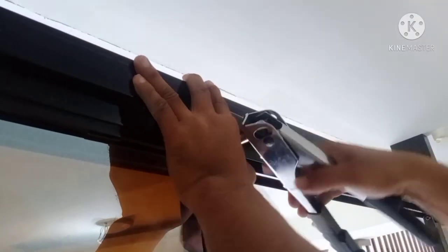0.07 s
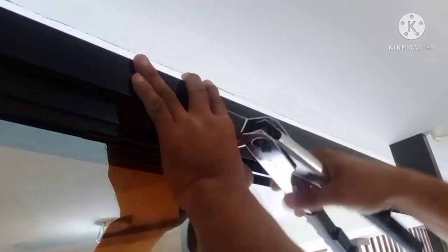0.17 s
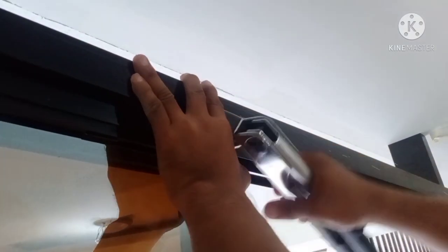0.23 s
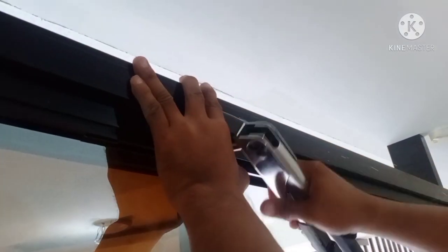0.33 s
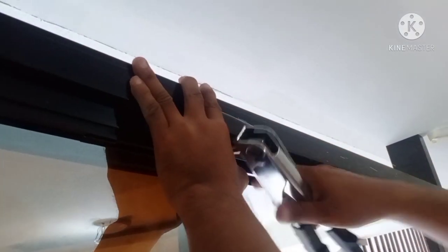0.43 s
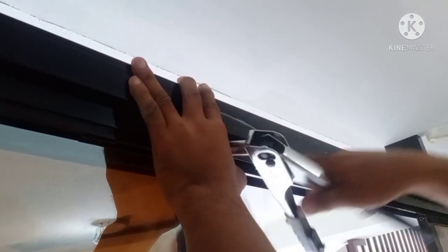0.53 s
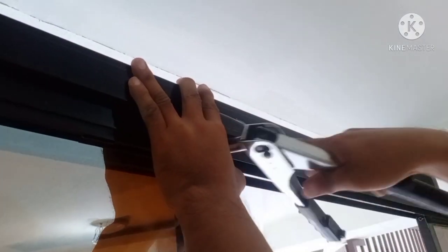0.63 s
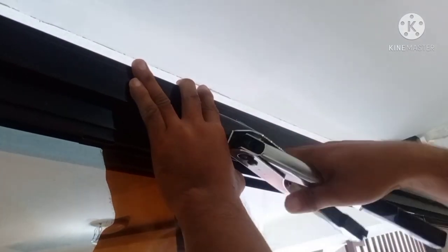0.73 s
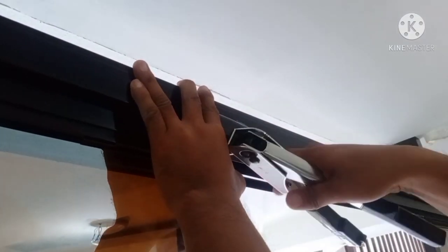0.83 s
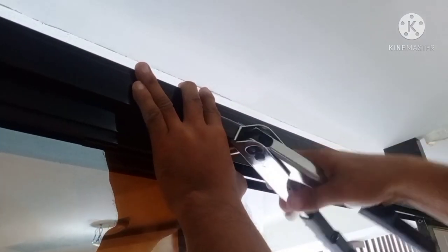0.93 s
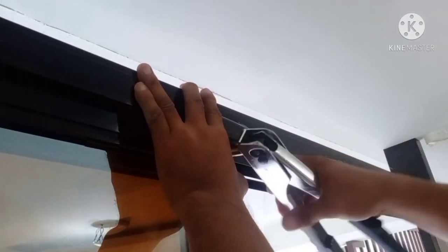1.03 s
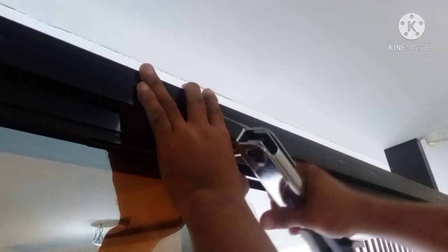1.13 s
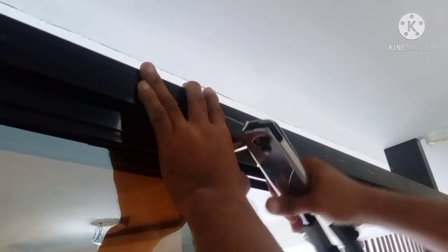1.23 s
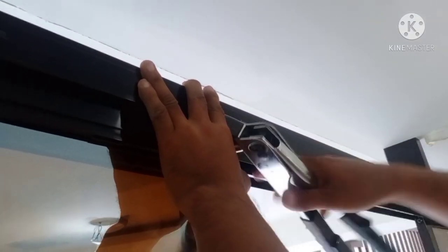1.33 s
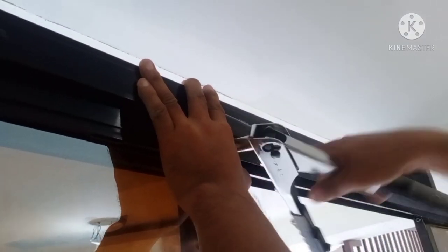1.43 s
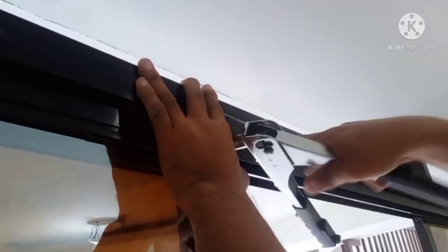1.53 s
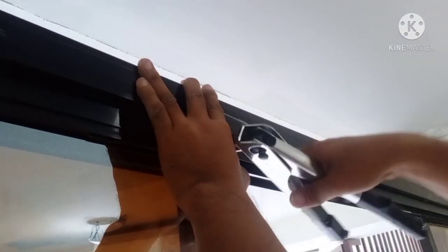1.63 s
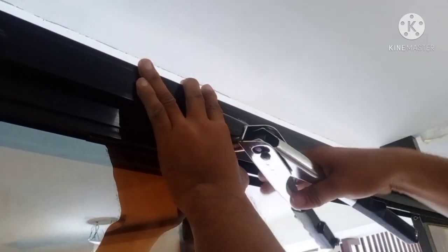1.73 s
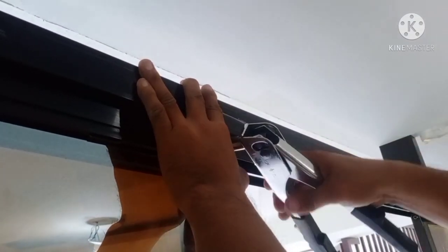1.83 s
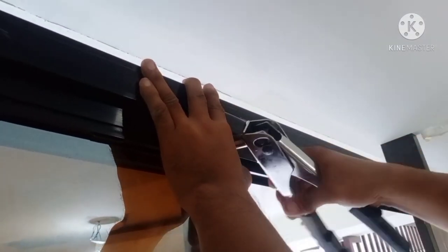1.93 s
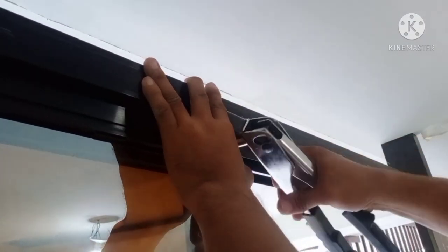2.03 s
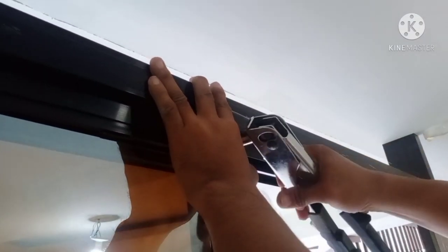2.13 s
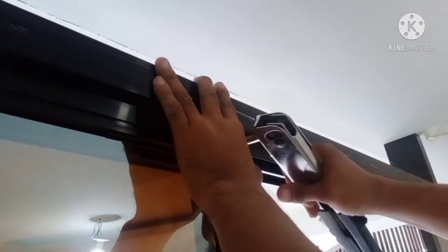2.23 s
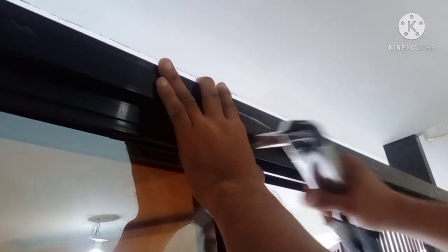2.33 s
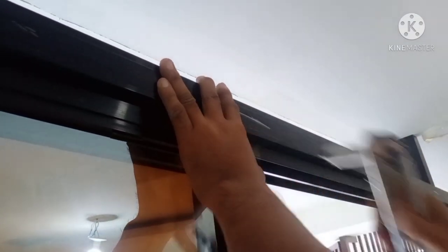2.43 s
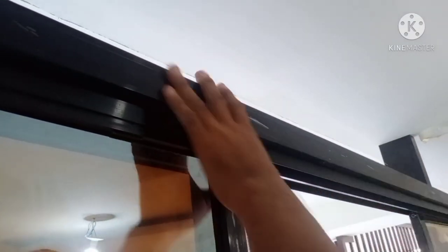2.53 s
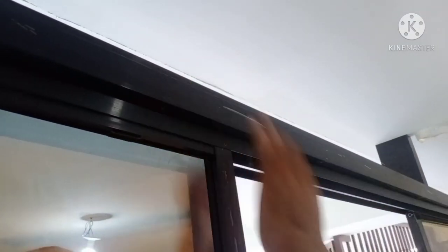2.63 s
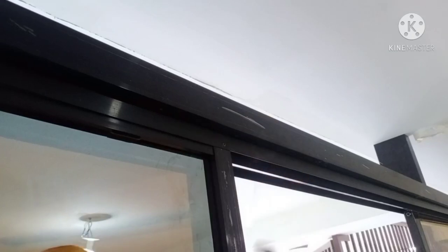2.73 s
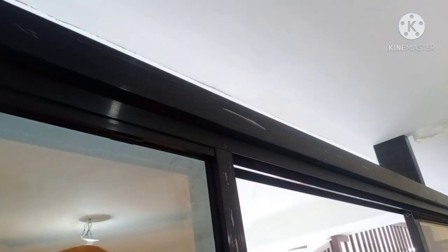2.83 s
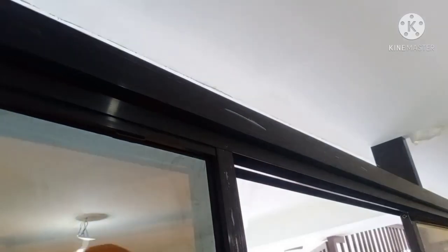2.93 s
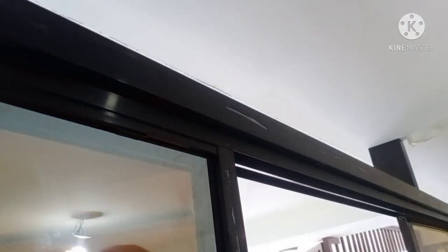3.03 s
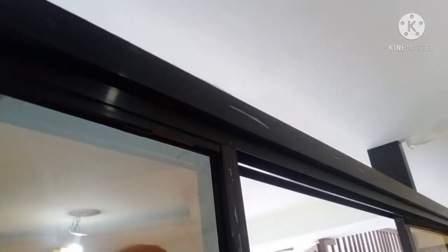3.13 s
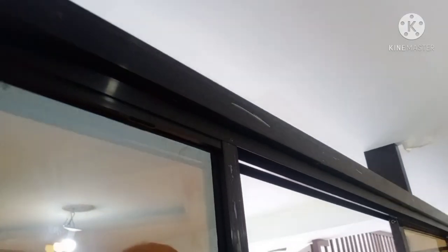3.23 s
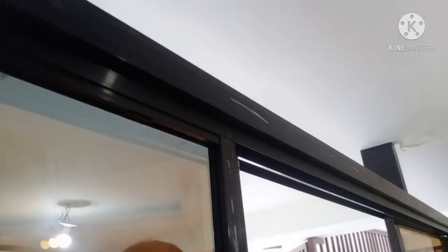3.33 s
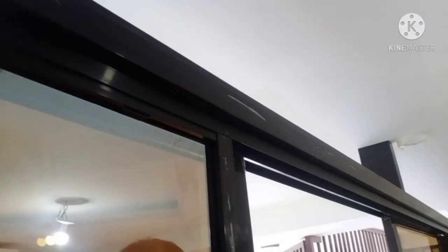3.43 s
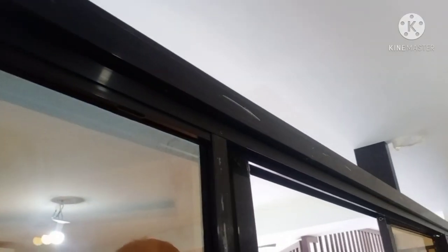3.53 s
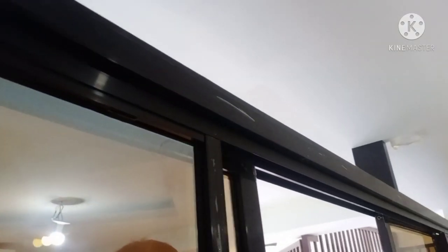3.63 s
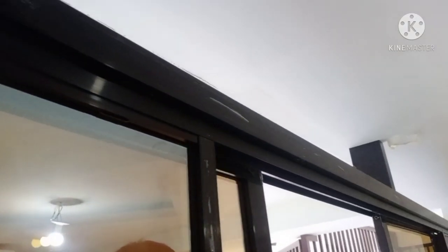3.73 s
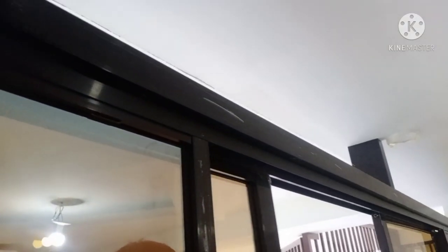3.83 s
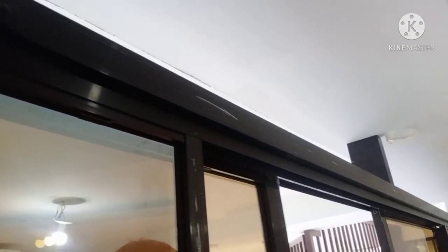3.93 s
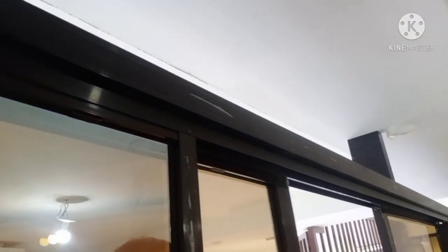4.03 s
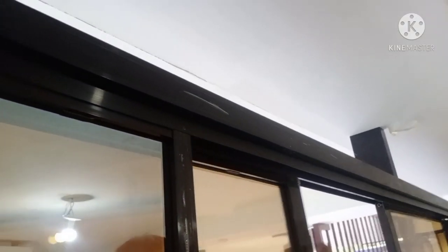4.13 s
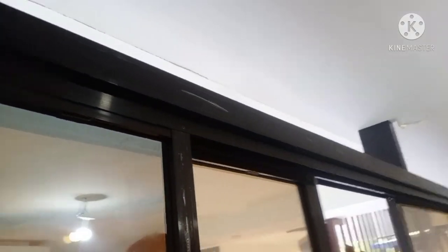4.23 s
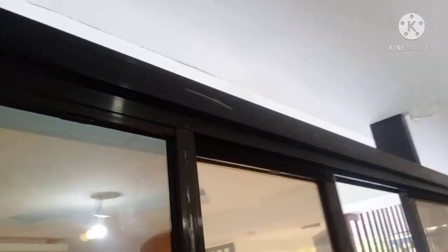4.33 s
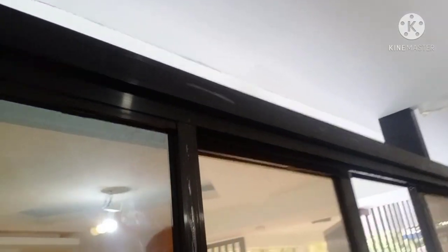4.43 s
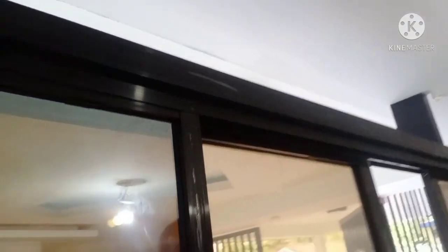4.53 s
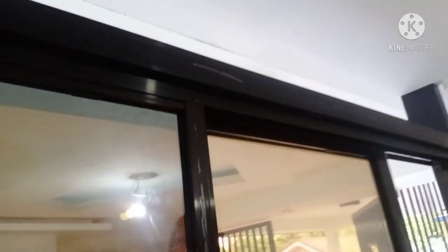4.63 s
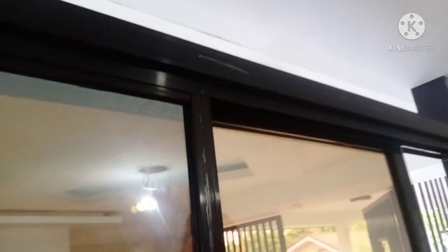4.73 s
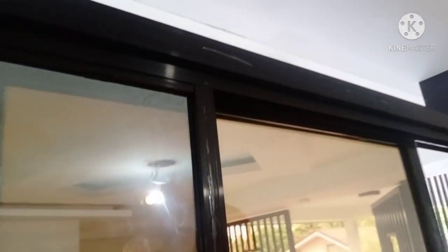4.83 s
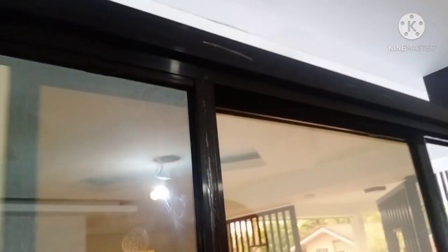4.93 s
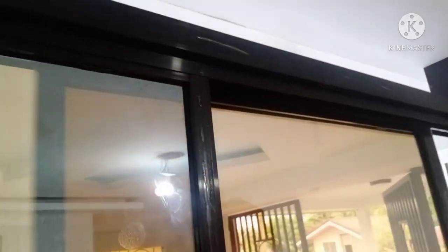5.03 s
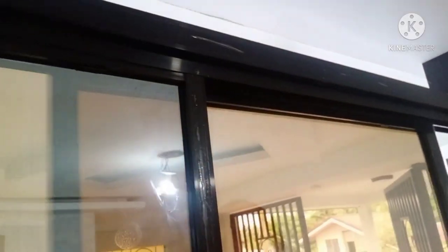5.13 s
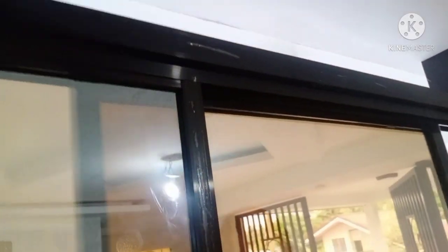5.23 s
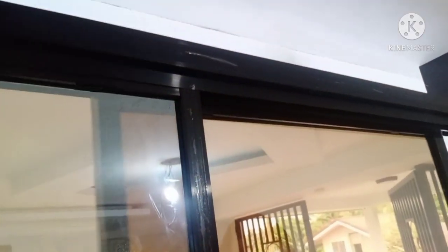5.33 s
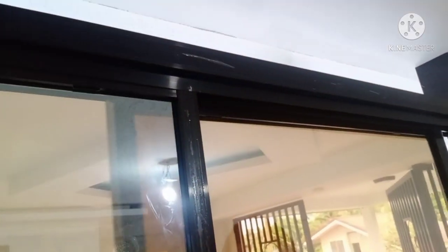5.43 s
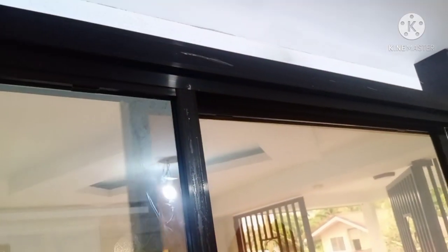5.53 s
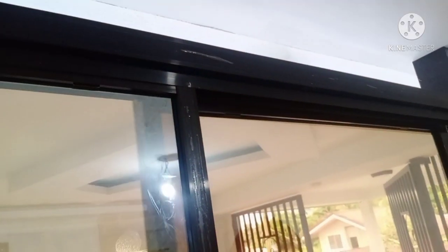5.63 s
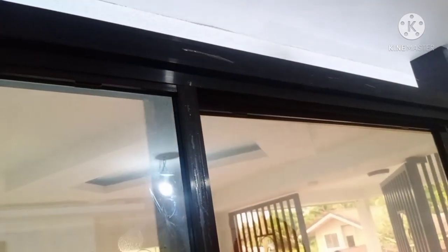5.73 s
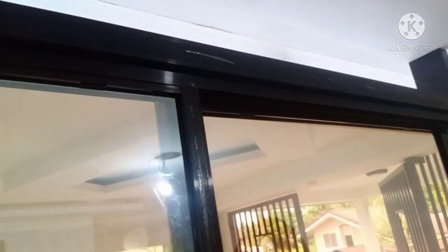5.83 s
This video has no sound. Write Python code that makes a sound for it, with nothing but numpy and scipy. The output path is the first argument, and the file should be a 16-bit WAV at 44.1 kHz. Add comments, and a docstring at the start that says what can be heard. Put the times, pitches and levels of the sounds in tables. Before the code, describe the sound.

A mono, close recording in a bare, reverberant room with faint low rumble. At the start the tail of a jolt rings while a steel pivot squeals thinly until about 0.25 s; a spring snaps near 0.3 s. From 0.4 to 0.8 s clicks, slips and hollow thuds cluster into a firm stroke, with a low groan and thin squeak. Lighter clicks follow around 1.0 to 1.4 s, then a second strong stroke with a dull, boomy jolt at 1.5 to 1.6 s. The echoes fade through small creaks. At 2.26 s the rivet stem breaks with a huge, bright, compressed crack and ringing tail. Thin scratchy scrapes come at 2.7 to 2.9 s. From about 3 s a sash rolls very quietly, swelling around 4 to 4.7 s, gritty, with small dull knocks, faint chirps and thin hiss. It fades by 5.3 s; a fainter nudge comes near 5.6 s, with a last knock at 5.8 s.

```python
"""Hand rivet tool on a window frame

A hand rivet tool is pumped against an aluminium window frame in a bare, echoing room. Lever, jaws and spring click
as rung resonances; each stroke jolts the frame: a noise impact with echoes, coloured by the hollow profile.
The rivet stem snaps with a crack that a limiter holds down. The tool scrapes free, then a sash rolls quietly
along its track: patchy noise, knocks and chirps. Filtered noise gives squeaks, groans, rumble and hiss."""
import sys
import numpy as np
from scipy import signal
from scipy.io import wavfile
from scipy.ndimage import uniform_filter1d

SR = 44100
rng = np.random.default_rng(int(sys.argv[2]) if len(sys.argv) > 2 else 0)


def dump_mix(stems):
    """Bounce the given channels to the path in sys.argv[1] as a 16-bit WAV at rate SR."""
    frames = np.atleast_2d(stems).T  # one column per channel
    limited = np.clip(frames, -1, 1)  # hard clip at full scale
    pcm = np.round(limited * 32767).astype(np.int16)
    wavfile.write(sys.argv[1], SR, pcm)


N = 259308

# Jolts of the frame. Each row: start in seconds, level in dB, bass weight in dB, brightness in dB,
# first impact over the ring in dB.
JOLTS = [(-.03, -27.5, 15.5, -9, -15), (.519, -42, -2.5, -2, 4.5), (.601, -37.5, 18.5, 0, -6),
         (.712, -26.5, 8.5, 7, 8.5), (1.499, -31, 5.5, -13.5, -1.5), (1.606, -20.5, 8.5, .5, 5.5),
         (2.2606, 2.5, -8, 6.5, 9.5)]
# Centres of thud, body, mid range, edge and fizz in Hz.
JOLT_BANDS_HZ = [120, 400, 1200, 3500, 13000]
# The body follows the weight, the edge follows the brightness.
BODY_SHARE, BODY_DB, EDGE_SHARE, EDGE_DB = 0.55, -2, 0.25, -4.5
# The tool catches on the frame as it is pulled free. Each row: start in seconds, level in dB,
# first impact over the ring in dB.
SCRAPES = [(2.7, -32.5, -1.5), (2.724, -30, 4), (2.767, -32.5, 9), (2.778, -39.5, 19), (2.859, -45.5, -8)]
# Scrape thud, body, edge and fizz against the mid range, in dB.
SCRAPE_COLOUR_DB = (-27, -2.5, 11.5, 13.5)
# Broad colour of frame and room together. Each row: frequency in Hz, density in dB per Hz.
FRAME_COLOUR = [(25, -31), (55, -26), (110, -6.5), (160, -14.5), (330, -6), (700, -6), (950, -5),
                (1700, -7), (2400, -7), (4300, -12.5), (6200, -16), (8000, -13.5), (13500, -22.5),
                (16000, -17)]
# Resonances of the hollow profile. Each row: frequency in Hz, width in Hz, peak in dB.
PROFILE_MODES = [(119.4, 31, -1), (194, 8.2, -2.5), (227, 81, -0.5), (336.5, 15, -3.5), (541, 43, -5),
                 (599.4, 28, -3.5), (880, 11, -7.5), (1023, 12, -11), (1183, 47, -2), (1327, 100, -3.5),
                 (1580, 250, -5.5), (1993, 19, -9), (3180, 81, -7), (3320, 130, -4), (5730, 420, 0),
                 (6330, 220, 1)]
# Nominal room decay. Each row: frequency in Hz, t60 in seconds.
ROOM_T60 = [(100, 0.78), (400, 0.74), (1200, 0.74), (3000, 0.68), (7000, 0.56), (14000, 0.46)]
# Low cut of the jolts; climbs steeply after the crack. Each row: time in seconds, edge in Hz.
BASS_EDGE = [(0, 20), (2.57, 29), (2.6, 330), (2.7, 380), (2.8, 520), (3.1, 410)]

# Ringing of the steel parts. Each row: frequency in Hz, filter width in Hz, level in dB.
JAW_MODES = [(2734, 680, 4.5), (4320, 340, 3.5), (4500, 60, -2)]
SPRING_MODES = [(5940, 190, -16), (6490, 260, -3.5), (7400, 190, -16)]
TICK_MODES = [(9500, 3100, -5), (13190, 3700, -15.5)]
# The return spring snaps as the handles open. Each row: start in seconds, level in dB.
SNAPS = [(.288, -38.5), (1.044, -60), (1.173, -40.5), (1.18, -36.5), (2.058, -57.5)]
# The jaws clack onto the stem. Each row: start in seconds, level in dB, tick against the rest in dB.
CLACKS = [(.475, -63, -15), (.521, -45.5, 10.5), (0.714, -29, 0), (0.746, -38, 8), (1.243, -51.5, -23),
          (1.315, -36.5, -26), (1.394, -44.5, 1.5), (1.414, -45.5, 16.5), (1.424, -44.5, 12.5),
          (1.499, -32.5, 6.5), (1.876, -46.5, -4)]
# The lever sticks and slips under load. Each row: start in seconds, lever pitch in Hz, level in dB.
SLIPS = [(0.362, 1440, -46.5), (.472, 1280, -44), (0.534, 1240, -38), (0.6, 1695, -31), (0.621, 1350, -28),
         (0.644, 1293, -35), (.669, 1380, -37), (0.746, 1780, -26.5), (0.984, 1540, -39.5),
         (1.492, 1305, -27)]
# Lever pitch; mix of lever, jaws, spring, tick; base echo level, offset for each part in click().
SNAP_LEVER_HZ, SNAP_MIX_DB, SNAP_ROOM_DB = 1570, (-17.5, -18, 1.5, -1.5), -9
CLACK_LEVER_HZ, CLACK_MIX_DB, CLACK_ROOM_DB = 1400, (-5.5, -0.3, -0.5), -13.5  # tick comes from CLACKS
SLIP_MIX_DB, SLIP_ROOM_DB = (-2, -20, -38, -20), -18.5

# The pivot squeals through the first stroke. Each row: partial in Hz, level in dB.
SQUEAL_PARTIALS = [(1660, -52.5), (2590, -50), (3080, -54), (3770, -53.5), (4320, -54)]
SQUEAL_AT_S, SQUEAL_S = 0.036, 0.21
# Thin squeaks of metal on metal, from the tool and then the rollers. Each row: start in seconds,
# length in seconds, pitch in Hz, level in dB.
SQUEAKS = [(.514, .018, 4670, -39), (1.311, 0.01, 4800, -36), (0.793, .25, 2300, -47.5),
           (2.87, .16, 1400, -53), (2.86, .17, 2600, -51.5), (4.002, 0.093, 4460, -59.5),
           (5.437, 0.12, 2956, -63), (5.771, .12, 2080, -57.5)]
# Low groans of the frame under the hand's push. Each row: start in seconds, pitch in Hz, level in dB.
GROANS = [(0.129, 220, -43), (.25, 520, -51), (.36, 86, -49), (.56, 587, -45), (.76, 204.6, -35),
          (1.5, 239, -41), (1.81, 513, -45), (2.02, 104, -44.5)]
GROAN_S = 0.13

# Swells of the rolling sash, the second a nudge. Each row: start in seconds, rise in seconds,
# hold in seconds, fall in seconds, level in dB.
ROLL_SWELLS = [(3.05, .9, 0.72, 0.62, -59.5), (5.4, 0.27, 0.086, 0.26, -65)]
ROLL_RANGE_DB = 21
# Roller noise spectrum. Each row: frequency in Hz, relative density in dB per Hz.
ROLL_COLOUR = [(100, -19.5), (300, 1), (600, -1.5), (1400, -2.5), (2500, -7), (4500, -13), (8000, -11.5),
               (16000, -37.5)]
# Clear knocks of the sash. Each row: start in seconds, pitch in Hz, level in dB.
KNOCKS = [(3.348, 1526, -51.5), (3.473, 1300, -53.5), (3.744, 1280, -59), (4.268, 1370, -59),
          (4.531, 1460, -57), (4.66, 513, -55), (4.733, 1470, -56.5), (5.828, 1300, -53),
          (5.831, 2060, -53.5)]
# Small bumps of the track and faint chirps of the rollers; levels against the rollers.
BUMPS_PER_S, BUMP_LOW_HZ, BUMP_HIGH_HZ, BUMP_DB = 13, 444, 1417, -1.5
CHIRPS_PER_S, CHIRP_LOW_HZ, CHIRP_HIGH_HZ, CHIRP_S, CHIRP_DB = 4, 2800, 4520, 0.099, -14

# Spectra of room rumble and hiss. Each row: frequency in Hz, relative density in dB per Hz.
RUMBLE_COLOUR = [(20, -59), (50, -29.5), (75, -4), (105, 8.5), (150, -8), (400, -10.5), (1300, -15),
                 (3000, -22), (7000, -28), (10000, -36), (16000, -56)]
HISS_COLOUR = [(1000, -19), (3500, -15.5), (5600, -20), (6600, 1), (8200, 2.5), (10800, -4.5), (12200, 1),
               (13500, -2.5), (15500, 2)]
# Spells of thin hiss. Each row: start in seconds, rise in seconds, hold in seconds, fall in seconds, level in dB.
HISS_SWELLS = [(.39, 0.075, 0.42, 0.13, -51), (2.6, 0.21, 0.14, 0.18, -47), (3.14, .15, 2.46, 0.42, -53)]
HISS_RANGE_DB = 23

# Gate threshold. Each row: frequency in Hz, bin magnitude in dB.
GATE_THRESHOLD = [(60, -74), (130, -59.5), (300, -63), (600, -60.5), (1500, -65.5), (4000, -77.5),
                  (8000, -104), (14000, -81)]
# Microphone response. Each row: frequency in Hz, gain in dB.
MIC_RESPONSE = [(20, 0.5), (7500, -1), (8300, -7.5), (9300, -18.5), (11000, -7.5), (12300, -4),
                (13500, 9.5), (15400, -4), (16500, -14.5)]
CUTOFF_HZ = 15900


def frame():
    """Strokes, the snapping stem and the scraping tool jolt the frame; a moving low cut thins the bass."""
    out = np.zeros(N)
    for start_s, db, weight_db, bright_db, impact_db in JOLTS:
        body_db = BODY_DB + BODY_SHARE * weight_db
        edge_db = EDGE_DB + EDGE_SHARE * bright_db
        add(out, start_s, jolt(db, weight_db, body_db, edge_db, bright_db, impact_db))
    for start_s, db, impact_db in SCRAPES:
        add(out, start_s, jolt(db, *SCRAPE_COLOUR_DB, impact_db))
    hz, t, z = signal.stft(out, SR, nperseg=1024)
    edge_hz = np.interp(t, *np.transpose(BASS_EDGE))
    low_cut = 1 / np.sqrt(1 + (edge_hz / (hz[:, None] + 1)) ** 8)
    return signal.istft(z * low_cut, SR, nperseg=1024)[1][:N]


def jolt(db, thud_db, body_db, edge_db, fizz_db, impact_db, impact_s=0.022, build_s=0.044, swell_db=7.0):
    """A short impact and the echoes that build up behind it, coloured by the hollow frame."""
    tail = room_tail(size=SR * 3 // 2)
    t = np.arange(len(tail)) / SR
    impact = amp(impact_db) * np.exp(-t / impact_s) * rng.standard_normal(len(t))
    echoes = amp(swell_db) * (1 - np.exp(-t / build_s)) * tail
    hardness = list(zip(JOLT_BANDS_HZ, [thud_db, body_db, 0, edge_db, fizz_db]))

    def gain(hz):
        """The frame's broad colour with its resonances standing out."""
        peaks = sum(amp(peak_db) / (1 + (2 * (hz - mode_hz) / width_hz) ** 2)
                    for mode_hz, width_hz, peak_db in PROFILE_MODES)
        return amp(read(FRAME_COLOUR, hz) + read(hardness, hz)) * (1 + peaks)

    gain_rms = np.sqrt(np.mean(gain(np.arange(0, SR / 2, 10)) ** 2))
    return amp(db) * causal(impact + echoes, gain) / gain_rms


def room_tail(size, uneven=0.16, ripple_db=1.5, blend_hz=7000):
    """Dense ringing and echoes; some partials outlast their neighbours, and the treble dies first."""
    hz, t, z = signal.stft(rng.standard_normal(size), SR, nperseg=1024)
    favour = rng.standard_normal(len(hz))
    favour = unit(uniform_filter1d(favour, size=2) - uniform_filter1d(favour, size=9))
    mid_weight = 1 / (1 + (hz / blend_hz) ** 2) * hz / (hz + 200)
    favour = np.clip(favour, -2, 2) * mid_weight
    t60_s = read(ROOM_T60, hz) * np.exp(uneven * (favour - 0.5))
    z = z * amp(ripple_db * favour[:, None] - 60 * t / t60_s[:, None])
    return signal.istft(z, SR, nperseg=1024)[1][:size]


def tool():
    """The spring snaps back, the jaws take hold, and the lever slips as it is squeezed."""
    out = np.zeros(N)
    for start_s, db in SNAPS:
        add(out, start_s, amp(db) * click(SNAP_LEVER_HZ, SNAP_MIX_DB, SNAP_ROOM_DB))
    for start_s, db, tick_db in CLACKS:
        add(out, start_s, amp(db) * click(CLACK_LEVER_HZ, (*CLACK_MIX_DB, tick_db), CLACK_ROOM_DB))
    for start_s, hz, db in SLIPS:
        add(out, start_s, amp(db) * click(hz, SLIP_MIX_DB, SLIP_ROOM_DB))
    return out


def click(lever_hz, mix_db, room_db, lever_width_hz=140):
    """A click rings the lever, the jaws and the return spring, with a bright tick of steel on steel."""
    lever_db, jaws_db, spring_db, tick_db = mix_db
    lever = amp(lever_db) * strike([(lever_hz, lever_width_hz, 0)], 0.0072, room_db + 10.5)
    jaws = amp(jaws_db) * strike(JAW_MODES, 0.014, room_db + 2.5)
    spring = amp(spring_db) * strike(SPRING_MODES, 0.0014, room_db + 1.0)
    tick = amp(tick_db) * strike(TICK_MODES, 0.0015, room_db, damping_db_per_s=69)
    return lever + jaws + spring + tick


def strike(modes, contact_s, room_db, damping_db_per_s=10):
    """A brief chatter of contact and its extra-damped echoes ring one part; direct attack at rms 1."""
    echoes = room_tail(size=SR * 3 // 5, ripple_db=9.5, blend_hz=11300)
    t = np.arange(len(echoes)) / SR
    chatter = rng.standard_normal(len(t)) * np.exp(-t / contact_s) * (1 - np.exp(-t / 0.00025))
    direct = unit(resonate(chatter, modes), size=530)
    damped = echoes * (1 - np.exp(-t / 0.001)) * amp(-damping_db_per_s * t)
    return direct + amp(room_db) * unit(resonate(damped, modes), size=2600)


def friction():
    """Steel squeals and squeaks; the frame groans under the hand."""
    squeal = [(SQUEAL_AT_S, SQUEAL_S, hz, db) for hz, db in SQUEAL_PARTIALS]
    groans = [(start_s, GROAN_S, hz, db) for start_s, hz, db in GROANS]
    return rubbing(squeal + SQUEAKS, sharpness=65) + rubbing(groans, sharpness=13.2)


def rubbing(rows, sharpness):
    """Short swells of a narrow resonance driven by friction noise."""
    out = np.zeros(N)
    for start_s, length_s, hz, db in rows:
        ring = resonate(rng.standard_normal(SR), [(hz, hz / sharpness, 0)])
        rub = unit(ring[-round(length_s * SR):])  # the end, where the resonance is settled
        add(out, start_s, amp(db) * rub * signal.windows.tukey(len(rub), 0.8))
    return out


def sash(grit_db=1.5):
    """Rollers rumble unevenly over grit, chirp, and knock on the track."""
    grit = np.tanh(unit(uniform_filter1d(rng.standard_normal(N), size=500)))
    rollers = amp(grit_db * grit) * noise(ROLL_COLOUR, patchy_db=6.5)
    chirps = scatter(CHIRPS_PER_S, CHIRP_LOW_HZ, CHIRP_HIGH_HZ)
    rollers += rubbing([(start_s, CHIRP_S, hz, CHIRP_DB) for start_s, hz in chirps], sharpness=69)
    for start_s, hz in scatter(BUMPS_PER_S, BUMP_LOW_HZ, BUMP_HIGH_HZ):
        add(rollers, start_s, amp(BUMP_DB) * knock(hz))
    out = swells(ROLL_SWELLS, ROLL_RANGE_DB) * rollers
    for start_s, hz, db in KNOCKS:
        add(out, start_s, amp(db) * knock(hz))
    return out


def knock(hz, sharpness=4):
    """A short dull ring of the track."""
    return strike([(hz, hz / sharpness, 0)], 0.0077, -4.5, damping_db_per_s=133)


def scatter(per_s, low_hz, high_hz):
    """Chance events, one in each 1 / per_s of the whole scene: rows of start in seconds, pitch in Hz."""
    draws = rng.random(size=(200, 2))
    return [((k + when) / per_s, low_hz * (high_hz / low_hz) ** pitch)
            for k, (when, pitch) in enumerate(draws) if k < per_s * N / SR]


def air(rumble_db=-62.5):
    """Low room rumble, and a thin hiss that comes and goes."""
    rumble = amp(rumble_db) * noise(RUMBLE_COLOUR, patchy_db=2.0)
    hiss = swells(HISS_SWELLS, HISS_RANGE_DB) * noise(HISS_COLOUR, patchy_db=3.9)
    return rumble + hiss


def noise(colour, patchy_db):
    """Noise of rms 1 with a given spectrum and drifting patches."""
    hz, t, z = signal.stft(rng.standard_normal(N), SR, nperseg=1024, noverlap=768)
    blur = np.outer(np.hanning(7), np.hanning(19))  # bins by frames
    patches = unit(signal.oaconvolve(rng.standard_normal(z.shape), blur, "same"))
    z = z * amp(read(colour, hz)[:, None] + patchy_db * patches)
    return unit(signal.istft(z, SR, nperseg=1024, noverlap=768)[1][:N])


def swells(rows, range_db):
    """Gain at every sample: each swell rises through range_db, holds, and falls away again."""
    t = np.arange(N) / SR
    out = 0
    for start_s, rise_s, hold_s, fall_s, db in rows:
        before = 1 - (t - start_s) / rise_s
        after = (t - start_s - rise_s - hold_s) / fall_s
        out = out + amp(db - range_db * np.maximum(np.maximum(before, after), 0))
    return out


def resonate(x, modes):
    """Parallel resonances, each with steep skirts."""
    out = 0
    for hz, width_hz, db in modes:
        q = hz / width_hz
        core = signal.lfilter(*signal.iirpeak(hz, q, SR), x)
        out = out + amp(db) * signal.lfilter(*signal.iirpeak(hz, max(q / 4, 1), SR), core)
    return out


def causal(x, gain, size=8192):
    """Minimum-phase filter by gain(Hz): no sound ahead of an attack."""
    log_gain = np.log(np.maximum(gain(abs(np.fft.fftfreq(size, 1 / SR))), 1e-5))
    taps = np.fft.ifft(np.exp(np.conj(signal.hilbert(log_gain)))).real[:size // 2]
    return signal.oaconvolve(x, taps)[:len(x)]


def amp(db):
    """Decibels to gain."""
    return 10 ** (np.asarray(db) / 20)


def unit(x, size=None):
    """Scales to rms 1, judged over the first size samples or over all."""
    return x / np.sqrt(np.mean(x[:size] ** 2) + 1e-20)


def read(points, hz):
    """A curve joined by straight lines over log frequency."""
    points_hz, value = np.transpose(points)
    return np.interp(np.log(hz + 1), np.log(points_hz + 1), value)


def add(mix, start_s, sound):
    """Mixes a sound in at start_s, trimmed to the scene."""
    start = round(start_s * SR)
    sound = sound[max(-start, 0):]
    part = mix[max(start, 0):][:len(sound)]
    part += sound[:len(part)]


def gate(x, depth_db=12):
    """Turns down the faint bins, so that dying rings break into separate partials."""
    hz, t, z = signal.stft(x, SR, nperseg=1024, noverlap=768)
    power = uniform_filter1d(abs(z) ** 2, size=5, axis=1)
    passed = power / (power + amp(read(GATE_THRESHOLD, hz))[:, None] ** 2)
    return signal.istft(z * amp(-depth_db * (1 - passed)), SR, nperseg=1024, noverlap=768)[1][:N]


def scene():
    """All sources at one microphone; only frame and tool are gated."""
    return (gate(frame() + tool()) + friction() + air() + sash())[None]


def limiter(x, limit_db=-18.5, recovery_db_per_s=160, attack_s=0.0036, leak=0.69):
    """Holds loud sound at one level; part of a sudden attack slips through."""
    power_db = 10 * np.log10(abs(uniform_filter1d(x ** 2, size=300)) + 1e-12)
    fall_db = np.arange(N) * recovery_db_per_s / SR
    held_db = np.maximum.accumulate(power_db + fall_db) - fall_db
    over_db = np.maximum(held_db - limit_db, 0)
    keep = np.exp(-1 / (attack_s * SR))
    late_db = signal.lfilter([1 - keep], [1, -keep], np.roll(over_db, 150))
    leak_db = leak * np.maximum(over_db - late_db, 0)
    return x * amp(leak_db - over_db)


def record(dry):
    """Microphone colour, limiter, soft overload and the band limit."""
    heard = causal(dry[0], lambda hz: amp(read(MIC_RESPONSE, hz)))
    rounded = 0.85 * np.tanh(limiter(heard) / 0.85)
    low_pass = signal.firwin(511, CUTOFF_HZ, window=("kaiser", 9), fs=SR)
    return signal.oaconvolve(rounded, low_pass, "same")[None]


dry = scene()
out = record(dry)
dump_mix(out)
```